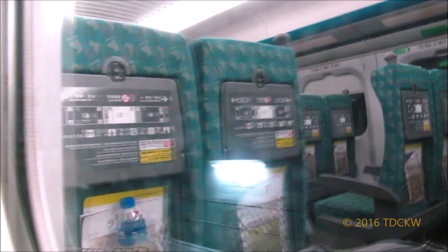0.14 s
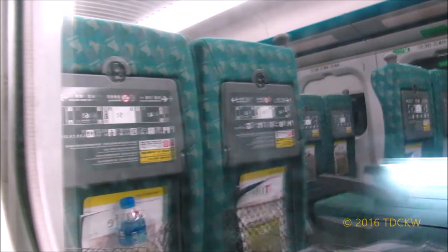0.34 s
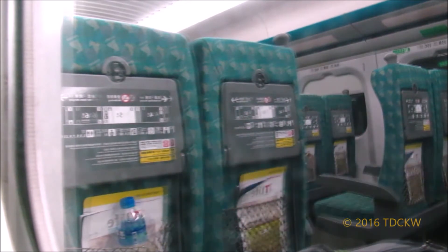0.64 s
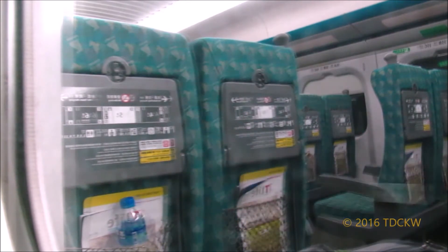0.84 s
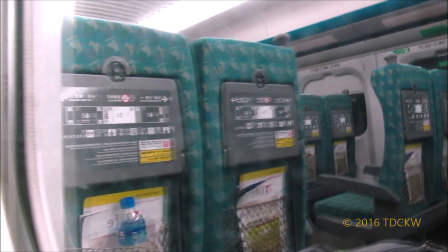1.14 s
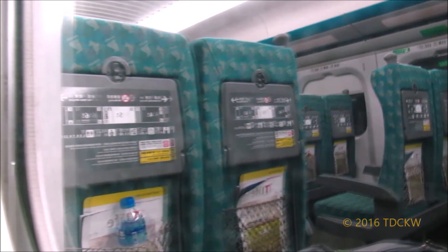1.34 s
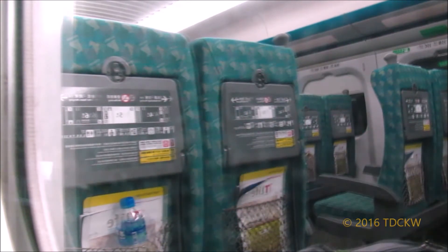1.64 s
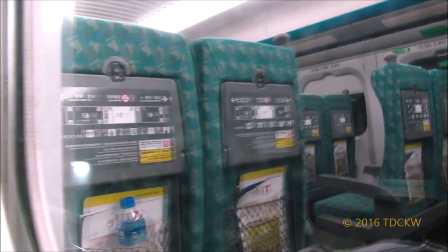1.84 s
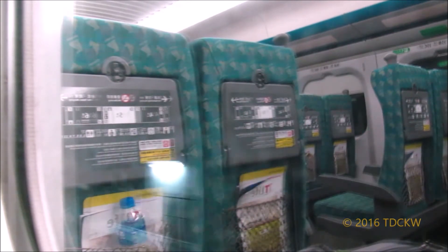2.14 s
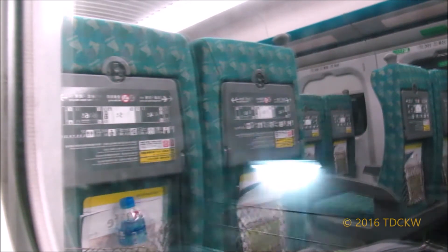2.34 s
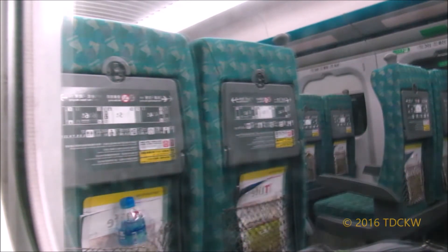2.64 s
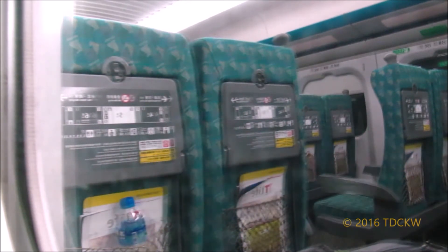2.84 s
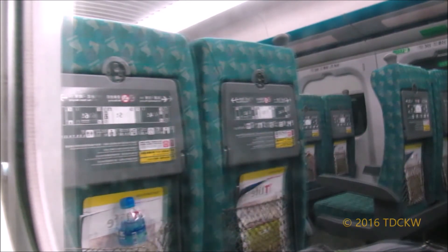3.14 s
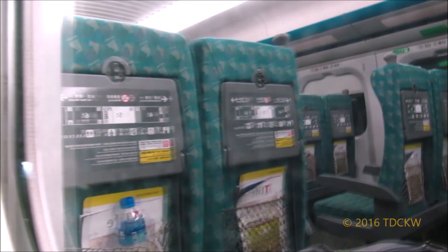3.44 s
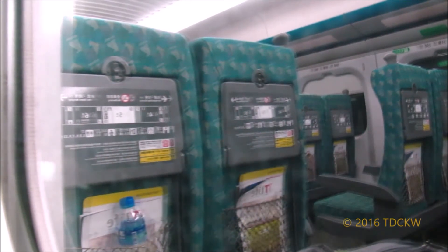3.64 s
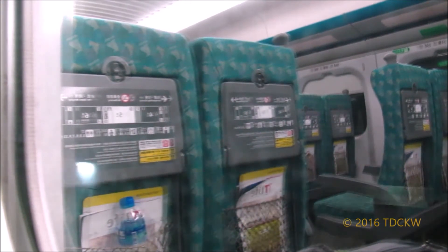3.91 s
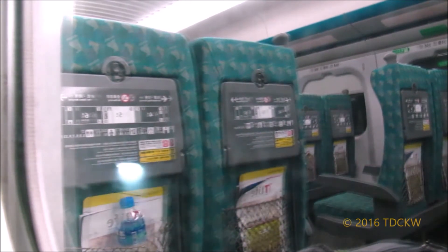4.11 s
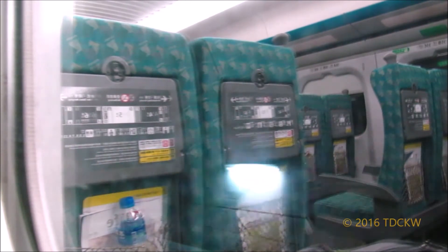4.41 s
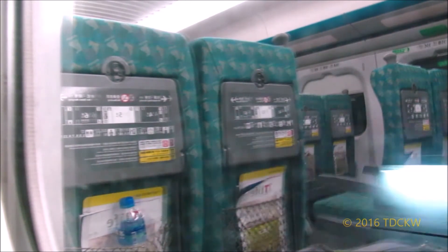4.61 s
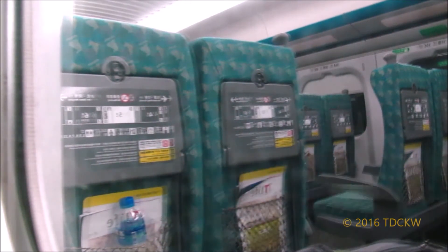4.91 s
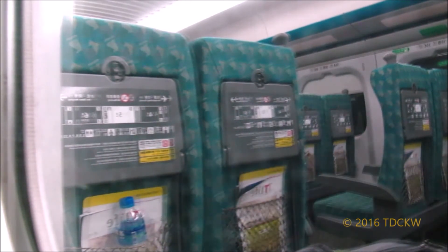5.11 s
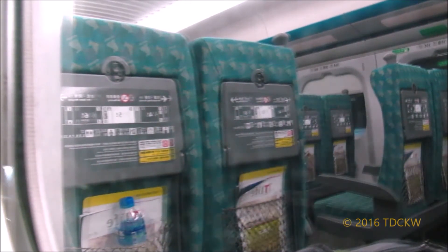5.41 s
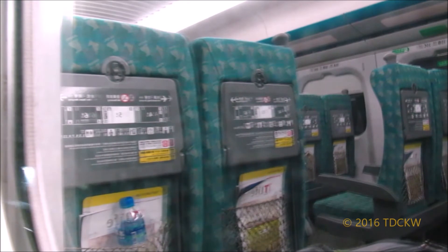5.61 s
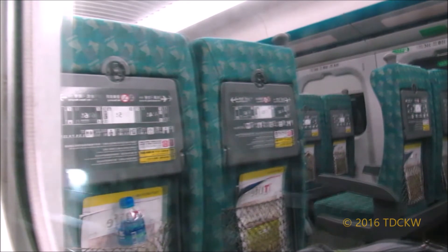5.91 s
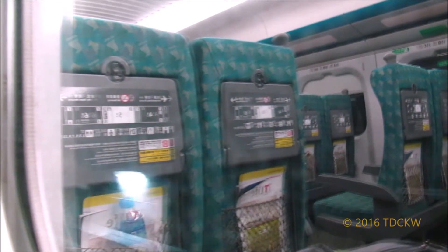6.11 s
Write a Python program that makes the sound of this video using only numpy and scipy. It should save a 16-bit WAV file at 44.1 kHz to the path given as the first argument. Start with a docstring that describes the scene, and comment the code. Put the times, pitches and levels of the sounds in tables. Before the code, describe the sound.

A train at speed, from a seat in the car. Rumble from rails and tunnel air runs unbroken throughout, dark and dense, while a fuzzy gear tone near 860 Hz whines with a fluttering edge. Bassy hum under the floor flickers in level, the floor booms now and then, and a thin air hiss sits far behind. Close, enclosed mono sound, with no distinct events.

```python
"""Inside the passenger car of a fast train in a tunnel: wheel and air roar come through the car body as
shaped noise, with body and floor modes booming as blurred tones. The traction gears whine as tooth tones
with sidebands at the shaft speed, among noise bands of floor panels and another axle. A wavering drone and
a power hum come from under the floor as blurred tones, and the ventilation hisses faintly as shaped noise."""
import sys
import numpy as np
from scipy import signal
from scipy.io import wavfile
from scipy.ndimage import uniform_filter1d

SR = 44100
rng = np.random.default_rng(int(sys.argv[2]) if len(sys.argv) > 2 else 0)


def transcribe(signal):
    """Save signal, clipped to [-1, 1], as a 16-bit WAV file at the path in sys.argv[1]."""
    frames = np.atleast_2d(signal).T
    limited = np.clip(frames, -1, 1)
    pcm = np.round(limited * 32767).astype(np.int16)
    wavfile.write(sys.argv[1], SR, pcm)


N = 276142

# Spectrum of wheel and tunnel air roar through floor and walls: f/Hz, relative level/dB
ROAR_SPECTRUM = [(8, -14), (20, -23), (28, -8), (45, -4.5), (60, -7), (78, -6), (120, -8), (140, -6.5),
                 (200, -6), (232, -8.5), (262, -7), (280, -10.5), (400, -15.5), (650, -17), (1250, -25.5),
                 (1800, -23.5), (1900, -28.5), (2620, -32), (2800, -35.5), (4700, -51.5)]
ROAR_DB = -22
# Rush of air in the upper roar, before its fixed lift: t/s, relative level/dB
RUSH_CURVE = [(0, -1), (.8, -0.5), (1.6, 0.1), (2, -1), (2.5, -0.4), (3.3, 0), (3.8, 0.5), (4.3, -0.6),
              (4.9, -0.8), (5.3, 0), (5.7, 0), (6.26, -1.5)]
RUSH_FROM_HZ, RUSH_LIFT_DB = 1000, 2
# Low modes of the car body: f/Hz, width/Hz, level/dB
BODY_MODES = [(46.8, 5.6, -36), (99.1, 8.5, -34.5), (120.7, 31, -37.5), (177.6, 9.5, -38), (251.2, 25, -38)]
# Floor mode that booms in bursts: t/s, level/dB
BOOM_CURVE = [(0.0, -41), (0.03, -30.5), (2.65, -36.5), (2.81, -27), (3.01, -47), (3.14, -31), (3.94, -31),
              (3.96, -40), (4.04, -23), (4.27, -38), (4.85, -32), (5.32, -40), (5.37, -32), (6.26, -27.5)]
BOOM_HZ, BOOM_WIDTH_HZ = 231.5, 24

# Whole gear whine, neighbouring noise bands included: t/s, level/dB
WHINE_CURVE = [(0, -25), (.4, -24.5), (1, -21.5), (2.2, -23), (3.35, -20), (3.57, -26), (3.75, -22.5),
               (4.45, -21), (4.72, -26), (5.2, -21), (5.65, -24.5), (6.26, -22.5)]
# Tooth tones and their sidebands: multiple of tooth rate, multiple of shaft rate, relative level/dB, width/Hz
WHINE_LINES = [(1, 0, -4, 6.1), (1, -1, -8.5, 8.5), (1, 1, -12.5, 6), (1, -2, -18, 9.3), (1, 2, -18.5, 11),
               (1, -3, -16, 8.7), (1, 3, -20, 14), (2, 0, -29, 3.2), (2, -1, -36, 7.2), (2, 1, -29, 10),
               (2, 2, -30, 5.9), (2, 3, -35, 8.6), (3, 0, -32, 60)]
# Noise bands around the whine: floor panels, and near 870 Hz the gears of another axle:
# f/Hz, width/Hz, relative level/dB
WHINE_BANDS = [(829.8, 93, -0.5), (871.5, 19.3, -5.5), (905, 110, -1), (1162, 52, -23.5), (2490, 220, -34)]
TOOTH_HZ, SHAFT_HZ = 861.3, 36.88

# Drone under the floor: t/s, level/dB
DRONE_CURVE = [(0.0, -31), (0.09, -19.5), (0.28, -26), (1.9, -23), (2.06, -29.5), (2.91, -22), (3.0, -27),
               (3.07, -22.5), (3.54, -32), (3.61, -45), (3.73, -30), (3.94, -44), (3.99, -25),
               (5.04, -29.5), (5.23, -37), (5.79, -21), (5.86, -43), (6.26, -29)]
DRONE_HZ, DRONE_OCTAVE_DB = 59.3, -34.5
# Power hum under the floor: t/s, level/dB
HUM_CURVE = [(0.0, -27.5), (1.46, -26), (1.51, -44), (1.6, -25), (2.06, -37), (2.3, -25), (2.75, -36.5),
             (2.81, -28), (4.34, -25), (4.44, -35), (4.93, -27), (4.99, -39), (5.07, -20.5), (5.51, -33),
             (5.58, -21), (6.26, -25.5)]
HUM_HZ, HUM_THIRD_DB = 120.0, -39

# Spectrum of the ventilation hiss: f/Hz, relative level/dB
HISS_SPECTRUM = [(3000, 4.5), (4200, -2.5), (6000, -3), (8200, -2), (8650, 3.5), (9100, -2.5),
                 (10500, -7.5), (13000, -24), (15700, -31)]
# Swells of the hiss: t/s, rise/dB, time from the peak until the rise is down to 1/e /s
HISS_SWELLS = [(.82, 2.5, .06), (1.2, 2.2, .05), (1.57, 2.5, .07), (1.95, 1.5, .1), (3.65, 2, .06),
               (4.055, 3, .06), (4.3, 1.2, .1), (4.6, 1.5, .06), (5.18, 1.5, .06), (5.9, 1.5, .05)]
HISS_DB, HISS_WANDER_RMS_DB = -49, 1.1

TOP_EDGE_HZ = 15760


def gain_of(db):
    """Decibels to an amplitude factor."""
    return 10 ** (np.asarray(db) / 20)


def evened(x):
    """Scales to rms 1."""
    return x / np.sqrt(np.mean(x ** 2) + 1e-20)


def along(curve):
    """Draws straight lines between the points of a level curve, at every sample."""
    t, db = np.transpose(curve)
    return np.interp(np.arange(N) / SR, t, db)


def noise(spectrum, patchy_db, size=2048):
    """Noise from random short-time spectra, with drifting louder and softer patches of the given rms."""
    hz = np.fft.rfftfreq(size, 1 / SR)
    frames = 4 * N // size + 5
    real, imaginary, patches = rng.standard_normal((frames, len(hz), 3)).T
    # smooth the patches over frequency, then over time
    patches = uniform_filter1d(patches, size=12, axis=0)
    patches = evened(uniform_filter1d(patches, size=8, axis=1))
    f, db = np.transpose(spectrum)
    shape_db = np.interp(np.log(hz + 1), np.log(f + 1), db, left=-90, right=-90)
    spectra = (real + 1j * imaginary) * gain_of(shape_db[:, None] + patchy_db * patches)
    _, sound = signal.istft(spectra, nperseg=size, noverlap=3 * size // 4)
    return evened(sound[:N])


def fuzzy_tone(hz, width, steady=0.):
    """A tone whose height and phase wander over the width in Hz; steady is the share of power that holds still."""
    pole = np.exp(-np.pi * width / SR)
    lead_in = SR // 4  # lets the filters settle
    wander = rng.standard_normal(N + lead_in) + 1j * rng.standard_normal(N + lead_in)
    for _ in range(2):
        wander = signal.lfilter([1], [1, -pole], wander)
    wander = wander[-N:]
    wander = wander / np.sqrt(np.mean(abs(wander) ** 2))
    steady = np.clip(steady, 0, 1)
    height = np.sqrt(steady) + np.sqrt(1 - steady) * wander
    carrier = np.exp(2j * np.pi * np.cumsum(hz * np.ones(N)) / SR)
    return evened((height * carrier).real)


def roar():
    """Low rumble from the rails, a livelier rush of air above it that swells and dips, and booming car modes."""
    low = signal.butter(2, RUSH_FROM_HZ, "low", fs=SR, output="sos")
    high = signal.butter(2, RUSH_FROM_HZ, "high", fs=SR, output="sos")
    rumble = signal.sosfiltfilt(low, noise(ROAR_SPECTRUM, patchy_db=1.02, size=4096))
    rush = signal.sosfiltfilt(high, noise(ROAR_SPECTRUM, patchy_db=1.72, size=2048))
    rush = gain_of(along(RUSH_CURVE) + RUSH_LIFT_DB) * rush
    body = sum(gain_of(db) * fuzzy_tone(hz, width) for hz, width, db in BODY_MODES)
    boom = gain_of(along(BOOM_CURVE)) * fuzzy_tone(BOOM_HZ, BOOM_WIDTH_HZ, steady=.25)
    return gain_of(ROAR_DB) * (rumble + rush) + body + boom


def gears():
    """Tooth tones with shaft sidebands, blurred since many axles run at slightly different speeds, in noise bands."""
    lines = 0
    for tooth, shaft, db, width in WHINE_LINES:
        hz = tooth * TOOTH_HZ + shaft * SHAFT_HZ
        # higher tooth multiples hold less still
        lines = lines + gain_of(db) * fuzzy_tone(hz, width, steady=0.19 / tooth ** 2)
    bands = sum(gain_of(db) * fuzzy_tone(hz, width) for hz, width, db in WHINE_BANDS)
    return gain_of(along(WHINE_CURVE)) * evened(lines + bands)


def drone():
    """A low tone that wavers in level, with a blurred octave below it at an even level."""
    tone = fuzzy_tone(DRONE_HZ, 14, steady=.95)
    octave_below = fuzzy_tone(DRONE_HZ / 2, 5, steady=.5)
    return gain_of(along(DRONE_CURVE)) * tone + gain_of(DRONE_OCTAVE_DB) * octave_below


def power_hum():
    """Hum of the power gear at twice the supply rate, rising and dipping, and its much blurred third multiple."""
    tone = fuzzy_tone(HUM_HZ, 14, steady=.88)
    third = fuzzy_tone(3 * HUM_HZ, 16, steady=.05)
    return gain_of(along(HUM_CURVE)) * tone + gain_of(HUM_THIRD_DB) * third


def ventilation():
    """Faint air hiss, shaped noise with small random level changes and a swell now and then."""
    t = np.arange(N) / SR
    hiss = noise(HISS_SPECTRUM, patchy_db=1.3, size=1024)
    # level changes: slow sines from 2 to 18 Hz in random phase, the faster the weaker
    wander = 0
    for hz in np.geomspace(2, 18, 20):
        wander = wander + np.sin(2 * np.pi * (hz * t + rng.random())) / np.sqrt(hz)
    wander_db = HISS_WANDER_RMS_DB * evened(wander)
    swell_db = sum(rise * np.exp(-((t - peak) / spread) ** 2) for peak, rise, spread in HISS_SWELLS)
    return gain_of(HISS_DB + swell_db + wander_db) * hiss


def scene():
    """All sources mix in the car, in one channel."""
    return (roar() + gears() + drone() + power_hum() + ventilation())[None]


def record(dry):
    """Cuts the treble steeply above the top edge with a symmetric low-pass, which adds no delay."""
    lowpass = signal.firwin(511, TOP_EDGE_HZ, window=("kaiser", 9), fs=SR)
    return signal.oaconvolve(dry, lowpass[None], "same")


dry = scene()
out = record(dry)
transcribe(out)
```